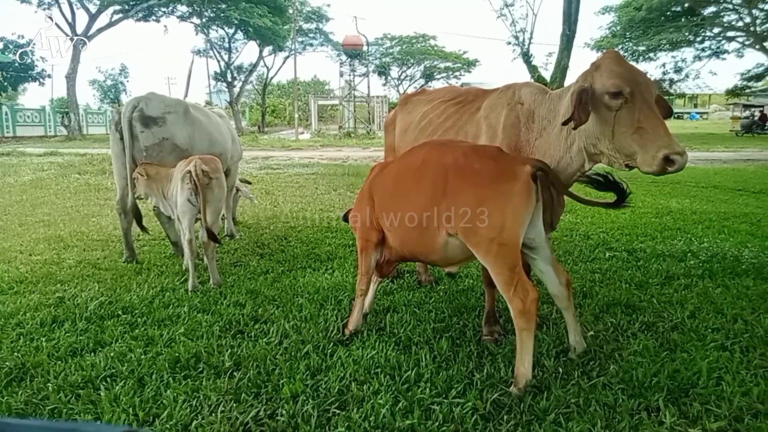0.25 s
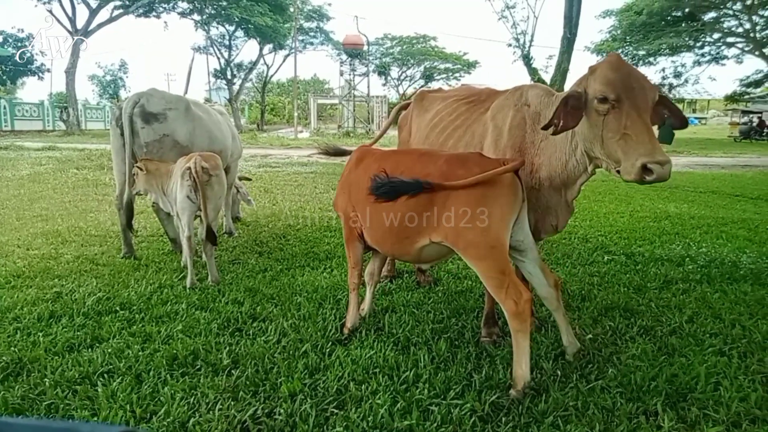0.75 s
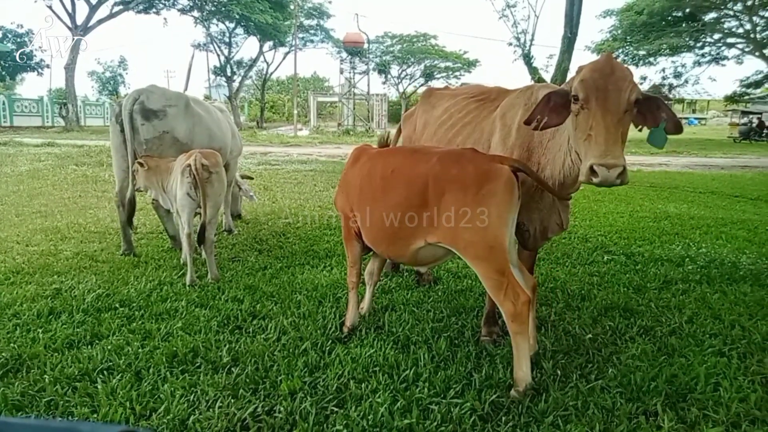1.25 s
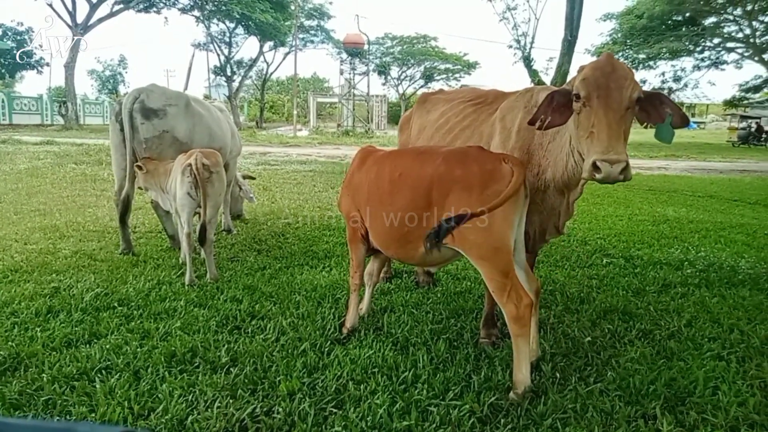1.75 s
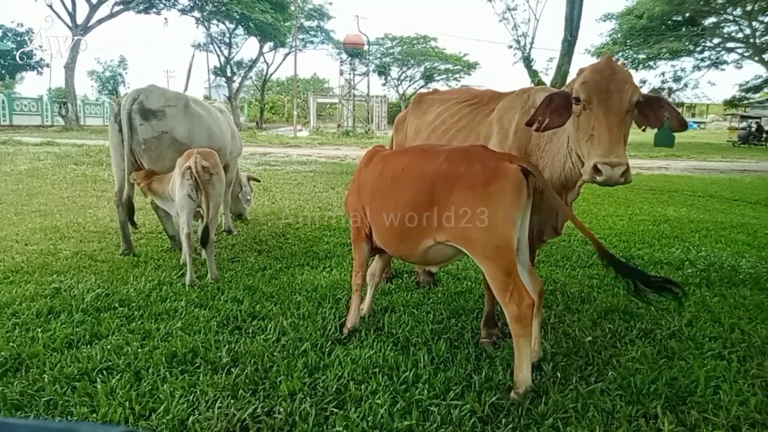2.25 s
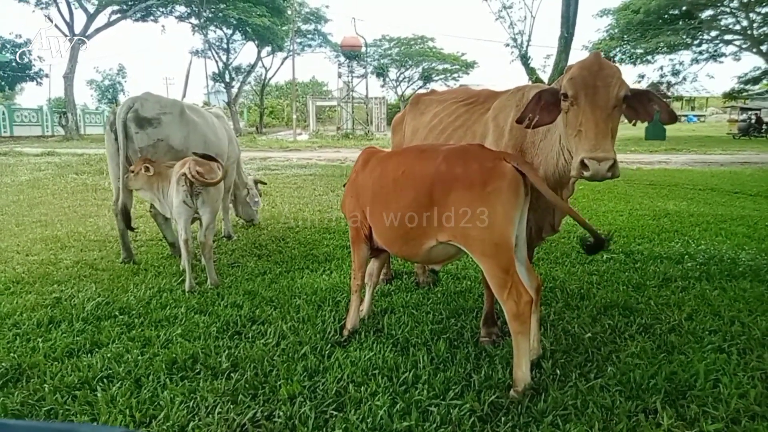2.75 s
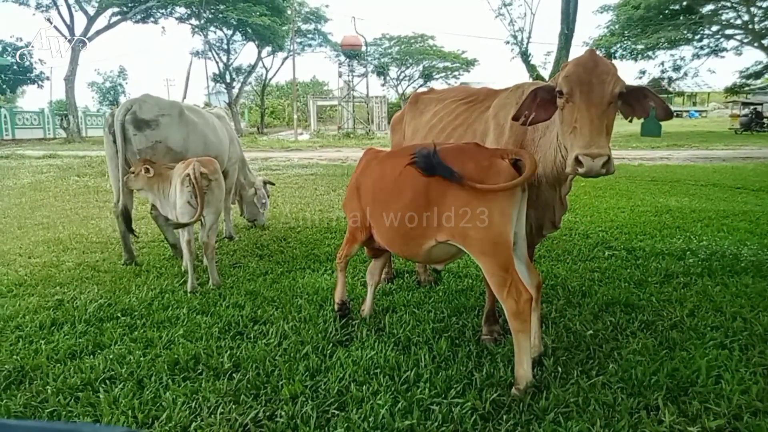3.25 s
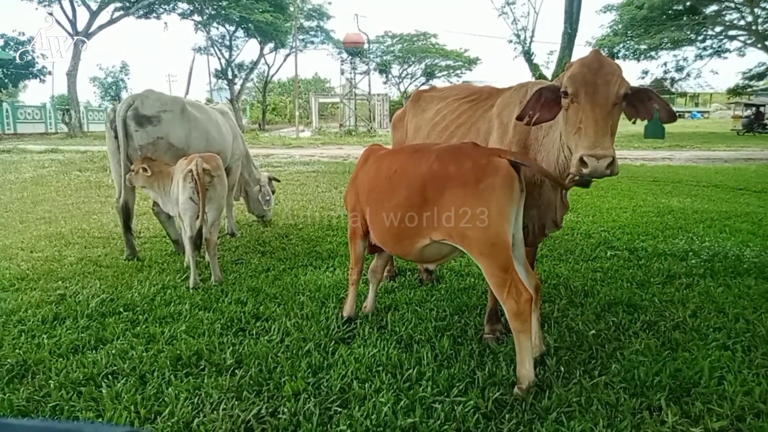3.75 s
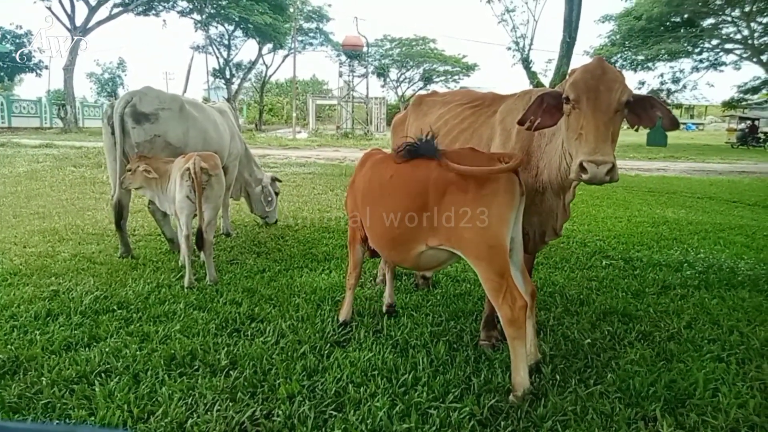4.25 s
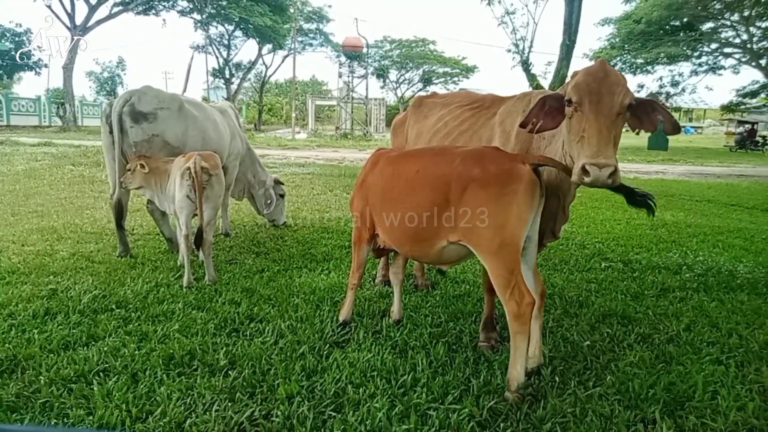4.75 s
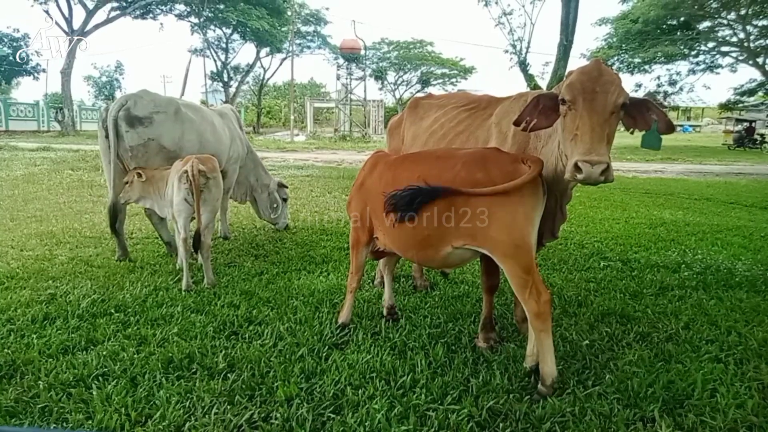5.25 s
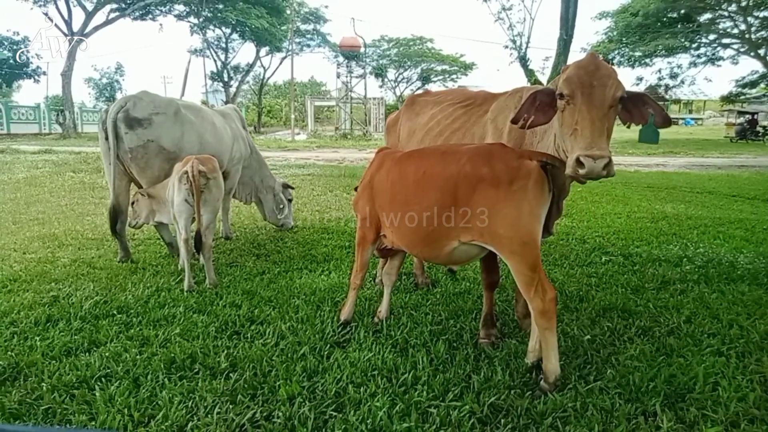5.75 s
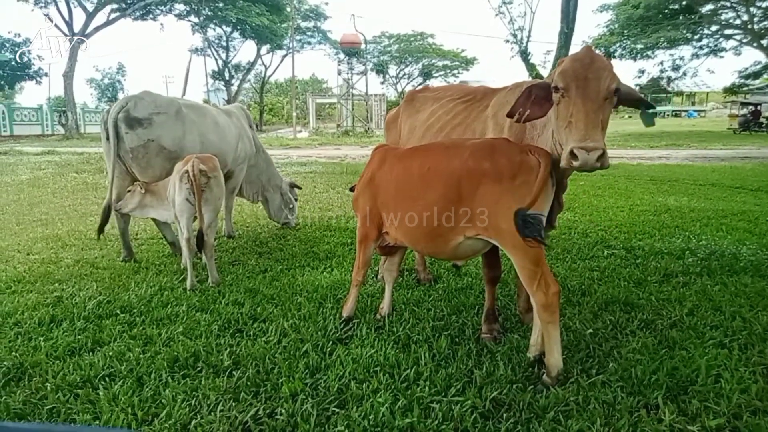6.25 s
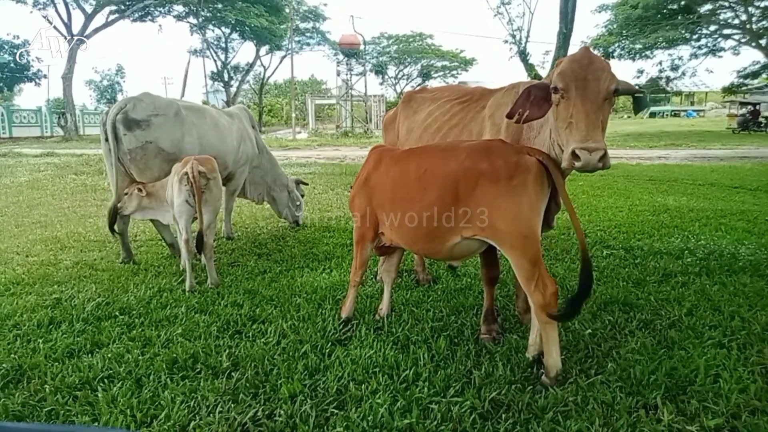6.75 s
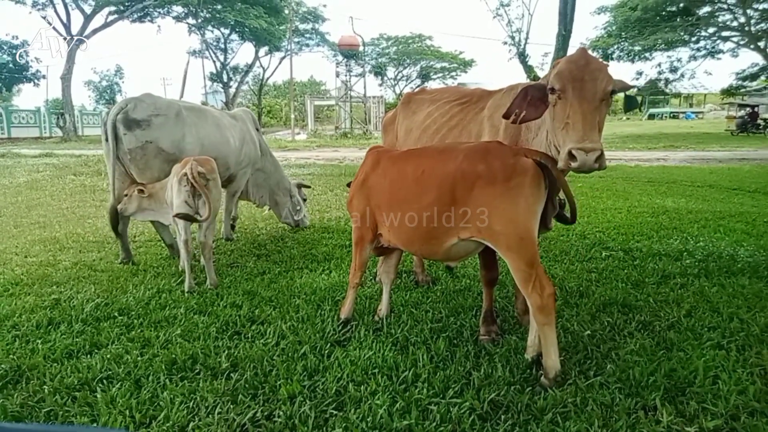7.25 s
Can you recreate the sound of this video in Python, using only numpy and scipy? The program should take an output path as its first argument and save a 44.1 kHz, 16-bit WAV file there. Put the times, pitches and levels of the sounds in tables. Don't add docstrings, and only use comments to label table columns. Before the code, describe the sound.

Two nearby cows call in turn: first a strong bellow caught midway that falls off within a second, then a lower muffled hum that brightens and swells before stopping suddenly. Grass snaps and hoof thuds accompany the first; nose breaths fill the gap. A distant cow overlaps the second. Steady engine rumble, leafy hiss, thin whine and tiny bird chirps continue in dry open air.

```python
import sys
import numpy as np
from scipy import signal
from scipy.fft import rfft, irfft, next_fast_len
from scipy.io import wavfile
from scipy.ndimage import uniform_filter1d, map_coordinates

SR = 44100
rng = np.random.default_rng(int(sys.argv[2]) if len(sys.argv) > 2 else 0)


def to_wav(sig):
    pcm = np.clip(np.atleast_2d(sig), -1, 1) * 32767
    pcm = np.round(pcm).astype(np.int16)
    wavfile.write(sys.argv[1], SR, pcm.T)


def ratio_of_db(decibels):
    return 10 ** (np.asarray(decibels, float) / 20)


N = 331191

# time in seconds, level in dB.
FIRST_EFFORT_DB = [(0, -25.5), (.03, -26.5), (.18, -22.5), (.49, -18.5), (.64, -18), (.72, -15.5),
                   (.78, -18), (.825, -27.5), (.862, -39)]
SECOND_EFFORT_DB = [(2.17, -40), (2.3, -26.5), (2.45, -22.5), (2.66, -21), (2.89, -22), (3.0, -21),
                    (3.168, -19.5), (3.374, -16.5), (3.537, -16.5)]
# time in seconds, pitch in Hz.
FIRST_PITCH_HZ = [(0, 169.4), (0.152, 175.3), (.335, 178.2), (.41, 175.9), (.6, 178.3), (.674, 171.6),
                  (.72, 158.8), (.806, 112.3), (0.884, 80.1)]
SECOND_PITCH_HZ = [(2.17, 91.3), (2.49, 121.9), (2.64, 131.5), (2.75, 136.5), (2.971, 139.4), (3.08, 139),
                   (3.202, 136.6), (3.401, 136.5), (3.535, 133)]
# frequency in Hz, level in dB.
EARLY = ([(174, -11.4), (348, -8.6), (522, -10.3), (696, -9.9), (870, -5.9), (1044, -8.8), (1218, -18.8),
          (1392, -8.4), (1566, -16.2), (1740, -12.9), (1914, -17.4), (2087, -21.8), (2261, -22.7)],
          [(2435, -24.1), (2783, -29.0), (3131, -26.8), (3305, -39), (3653, -35.8), (3827, -41.1),
          (4001, -37.6), (4175, -40.7), (4349, -51.5), (4697, -54.6), (5045, -45.5), (5219, -47.7)])
HELD = ([(177, -12.7), (354, -9.1), (531, -7.7), (709, -10.1), (886, -6.2), (1063, -8.3), (1240, -20.0),
         (1417, -8.1), (1594, -17.1), (1771, -17.8), (1948, -19.9), (2126, -24.0), (2303, -28.7)],
         [(2480, -27.8), (3011, -33.7), (3188, -28.9), (3365, -38.3), (3543, -33.1), (3897, -43.8),
         (4074, -36.8), (4428, -51.2), (4605, -55.7), (4782, -47.5), (4960, -43.6), (5314, -55.1)])
TURNING = ([(170, -18), (340, -8), (510, -9), (680, -8), (850, -8), (1020, -5), (1190, -19), (1360, -13),
            (1530, -17), (1700, -9), (1870, -24), (2040, -12), (2210, -19)], [(2380, -26), (2720, -25),
            (2890, -34), (3230, -28), (3570, -33), (3900, -42), (4500, -52), (5100, -50)])
DROPPING = ([(159, -19), (318, -7), (477, -12), (636, -6), (795, -12), (954, -4), (1113, -13), (1272, -19),
             (1431, -8), (1590, -15), (1749, -12), (1908, -25), (2067, -15)], [(2226, -20), (2385, -24),
             (2700, -24), (2940, -32), (3180, -25), (3500, -32), (3900, -38), (4900, -55)])
CLOSING = ([(138, -24), (277, 0), (415, -19), (554, -9), (692, -17), (830, -10), (969, -3.5), (1107, -16),
            (1246, -27), (1384, -1), (1523, -19), (1661, -9), (1799, -21)], [(1938, -20), (2100, -10),
            (2300, -22), (2630, -22), (2907, -24), (3460, -31.5), (3876, -40), (4291, -46), (4983, -62)])
FADING = ([(113, -21), (226, -3), (340, -12.5), (453, -22), (566, -12), (679, -15), (792, -17), (905, -6),
           (1019, -12), (1132, -23), (1245, -24), (1358, -10), (1471, -18)], [(1700, -15), (2040, -29),
           (2330, -9), (2650, -32), (2900, -24), (3400, -30), (4000, -36), (4600, -48)])
# frequency in Hz, level in dB.
MURMUR = ([(115, -8), (231, -7.5), (346, -5.5), (462, -8), (577, -15), (692, -25), (808, -14), (923, -15),
           (1039, -5), (1154, -20), (1270, -13), (1385, -15), (1500, -20)], [(1600, -20), (2080, -20),
           (2250, -7), (2420, -13), (2700, -30), (3000, -16), (3400, -17), (4200, -44)])
HUM = ([(134, -6), (269, -10), (403, -2), (537, -7), (672, -21), (806, -9), (941, -11), (1075, -8),
       (1209, -17), (1344, -24), (1478, -24), (1612, -31), (1747, -34)], [(1880, -11), (2040, -10),
       (2190, -5.5), (2270, -2), (2340, -19), (2450, -21), (2600, -33), (2900, -20), (3250, -18),
       (3800, -31), (4400, -53)])
LATE_HUM = ([(137, -7), (274, -8), (411, -4.5), (548, -8), (685, -12), (822, -16), (959, -11), (1096, -15),
             (1233, -13), (1370, -17), (1640, -28)], [(1900, -13), (2055, -10), (2190, -7), (2330, -17),
             (2600, -30), (3150, -21), (3400, -24), (3800, -34), (4400, -52)])
CRACKED = ([(138, -10), (276, -8), (414, -17), (552, -8), (690, -4), (828, -14), (966, -5), (1104, -16),
            (1242, -24), (1650, -24)], [(1930, -11), (2070, -11), (2210, -11), (2350, -23), (2760, -30),
            (3170, -13), (3400, -27), (4400, -55)])
BURST = ([(138, -12), (277, -2), (415, -9), (554, -10), (692, -8), (830, -19), (969, -1), (1107, -15),
          (1246, -17), (1520, -15), (1660, -24)], [(1800, -21), (1940, -12), (2077, -5), (2215, -19),
          (2560, -30), (2770, -19), (2910, -31), (3185, -22), (3460, -36), (4400, -50), (5200, -52)])
POPPED = ([(139, -16.7), (279, -4.2), (418, -11.3), (557, -12.7), (696, -13.1), (836, -19.5), (975, -8.3),
           (1114, -11.2), (1253, -25), (1393, -14), (1532, -18), (1671, -24), (1810, -21.5)], [(1950, -17),
           (2089, -10.5), (2367, -24), (2500, -33), (2785, -28), (2924, -22), (3481, -39), (3621, -37),
           (3899, -43), (4038, -52), (4595, -55.6), (5152, -52.1), (5292, -57.9)])
PARTED = ([(139, -16.7), (279, -4.2), (418, -11.3), (557, -12.7), (696, -13.1), (836, -16.6), (975, -8.8),
           (1114, -11.2), (1253, -23), (1393, -13.2), (1532, -16.5), (1671, -19.3), (1810, -17.5)],
           [(1950, -30), (2089, -15), (2228, -21), (2367, -25), (2785, -31), (2924, -40), (3064, -25),
           (3200, -34), (3481, -40.8), (3621, -36.1), (3899, -42.0), (4038, -50.5), (4595, -55.6),
           (5152, -52.1), (5292, -57.9)])
OPENING = ([(137, -19.4), (275, -2.8), (412, -13.0), (550, -11.9), (687, -10.6), (825, -18.0), (962, -9.1),
            (1100, -15.7), (1237, -17.4), (1375, -19.6), (1512, -13.9), (1650, -20.5), (1787, -22.5)],
            [(1925, -25.7), (2062, -20.7), (2475, -37.4), (2612, -27.3), (2750, -40.0), (3025, -33.0),
            (3162, -40.4), (3300, -35.5), (3712, -46.7), (4124, -46.9), (4262, -55.7), (5224, -60.6)])
WIDE = ([(136, -27), (273, -2.9), (409, -14.9), (545, -12.4), (682, -11.2), (818, -20.5), (955, -10.2),
         (1091, -15), (1227, -18.9), (1364, -25.4), (1500, -9.3), (1636, -26.5), (1773, -22.7)],
         [(1909, -29.3), (2182, -16.9), (2318, -34.2), (2455, -27.2), (2864, -39.4), (3000, -28.0),
         (3137, -43.0), (3955, -42.0), (4364, -47.8), (4773, -63.8), (5046, -51.2), (5182, -64.5)])
LAST = ([(134, -27), (269, -2.8), (403, -13.8), (537, -12.3), (671, -11.3), (806, -19.1), (940, -11.2),
         (1074, -10.3), (1208, -20.0), (1343, -26.1), (1477, -11.2), (1611, -28.4), (1746, -20.0)],
         [(1880, -25.2), (2417, -26.1), (2551, -37.7), (2685, -24.4), (2820, -41.5), (3223, -33.6),
         (3625, -49.6), (3894, -42.8), (4162, -59.5), (4297, -46.1), (4700, -59.5), (5102, -58.1)])
# time in seconds, shape number.
FIRST_MOUTH = [(.12, 0), (.35, 1), (.62, 1), (.68, 2), (.72, 3), (.76, 4), (.8, 5)]
SECOND_MOUTH = [(2.48, 0), (2.58, 1), (2.66, 1), (2.74, 2), (2.84, 2), (2.868, 3), (2.88, 3), (2.898, 4),
                (2.925, 5), (2.97, 5), (3.02, 6), (3.09, 6), (3.15, 7), (3.18, 7), (3.24, 8), (3.42, 8),
                (3.48, 9)]
# time in seconds, air re tone in dB, loss of upper overtones in dB per kHz.
HOARSE = [
    [(0, -16, .6), (.15, -17, .5), (.27, -14.5, 1.5), (.39, -28, 0), (.47, -22, 0), (.56, -17.5, .8), (.63, -28, 0), (.79, -26, 0), (.825, -27, 8)],
    [(2.17, -16, 0), (2.86, -21, 0), (2.93, -26, 0), (3.0, -31, 0), (3.2, -29, 0), (3.54, -25.5, 0)],
]
# frequency in Hz, level in dB per Hz.
BUZZ = ([
    [(3060, -28), (5200, -3.5), (5860, -2), (7070, -4), (8940, -7), (10300, -10), (11800, -5), (12600, -10), (14500, -2), (15300, -8), (15750, -9)],
    [(3060, -30), (5200, -1), (5520, 6), (7110, -13), (7680, 0), (10200, -6), (11700, -3), (12700, -2), (14400, 1), (15200, 0), (15750, -15)],
])
# buzz at the pivot level in dB, slope in dB per dB.
BUZZ_LAW = [
    (-59, 0.8),
    (-59, 1),
]
# lead in half cycles, lag in half cycles,
# centre in Hz, width in Hz.
CHEST = [
    (.9, .8, 330, 150),
    (.7, .6, 180, 180),
]
CUT_SHARE = (.17, .21)
PIVOT_DB = -20
LIPS_PART_S, PARTING_S, MUFFLE_DB = 2.872, 0.026, -12
CHEST_LAG_S, CHEST_DIP_NEPER = 0.039, 0.44
RIPPLE_HZ, RIPPLE_DEPTH, SHUT_DEPTH, SHUT_LIFT_DB = 1025, (.1, .2), .7, 6
GRAIN_DB, GRAIN_HZ = 6, 150

# peak in seconds, half length in seconds, level in dB, hiss in dB.
BREATHS = [(.13, 0.18, -39.5, -66), (0.554, 0.068, -43, -70), (1.086, 0.15, -45.5, -68),
           (1.61, 0.23, -37, -54), (2.051, 0.097, -49, -77), (2.592, 0.43, -40, -63),
           (2.607, 0.045, -63, -58.5), (6.172, 0.24, -50.5, -69), (7.165, 0.12, -42.5, -58.5)]
# centre in Hz, width in Hz, gain in dB.
NOSE = [(790, 180, -10.5), (1560, 110, -2), (2270, 420, -12.5), (2600, 266, -9.5), (3335, 162, -9)]
NOSTRIL = [(6430, 1600, 1), (9400, 2800, -6.5)]

FAR_S, FAR_END_S, FAR_ATTACK_S, FAR_RELEASE_S, FAR_DB, FAR_ACCENT_DB = 2.41, 3.33, 0.041, 0.115, -37, 9
FAR_HZ, FAR_CLIMB_HZ, FAR_CLIMB_S, FAR_DROP_HZ = 303, 80, .2, 50

# time in seconds, peak in dB, centre in Hz.
SNAPS = [(.194, -32, 9700), (.194, -26, 6700), (.204, -34, 10200), (.211, -32, 9900), (.212, -27, 6750),
         (.288, -38, 6500), (7.382, -33, 8000)]
SNAP_WIDTH_SHARE, SNAP_T60_S = 0.18, 0.0091
# time in seconds, peak in dB.
HOOVES = [(.251, -31), (.637, -26), (5.12, -36.5)]
HOOF_HZ, HOOF_WIDTH_HZ, HOOF_T60_S = 445, 140, .07

# time in seconds, length in seconds, start in Hz, end in Hz, level in dB.
CHIRPS = [(0, 0.033, 4700, 4500, -62), (.21, 0.044, 5500, 5900, -63), (.6, 0.049, 6363, 6244, -60),
          (3.54, 0.068, 4350, 5100, -70), (3.972, .014, 4600, 5700, -64), (3.98, 0.032, 5400, 5550, -66),
          (4.0, .02, 6400, 6500, -72), (6.11, .08, 7450, 7050, -68), (6.16, .055, 6700, 6600, -68),
          (6.17, 0.036, 6300, 6050, -69)]
# time in seconds, length in seconds, level in dB.
FALLS = [(.805, .135, -69), (2.57, .08, -68), (4.43, .1, -66)]
FALL_START_HZ, FALL_END_HZ = 4900, 3950

# time in seconds, length in seconds, frequency in Hz, level in dB.
PASSING_ORDERS = [(2.66, .24, 114, -41), (6.45, 0.37, 165.1, -47), (6.6, 0.52, 141.9, -48),
                  (6.92, 0.32, 248.3, -55.5), (7.02, 0.32, 303, -59), (7.202, 0.35, 238.4, -55.5),
                  (6.15, 0.26, 350, -63), (6.282, 0.35, 439, -67), (6.4, 0.68, 385, -66),
                  (7.301, 0.19, 419, -63.5)]
SAG = 0.99

# frequency in Hz, level in dB per Hz.
TRAFFIC = [(15, -69), (25, -25), (65, -9.5), (129, 3), (217, -10.5), (257, -14.5), (287, -35), (330, -28),
           (430, -46), (730, -120)]
# peak in seconds, half length in seconds, swell in dB.
PASSES = [(.55, 0.26, 2.5), (1.323, 0.07, 2.5), (2.003, 0.18, 2.5), (2.7, 0.47, 3), (5.493, 0.21, 3.5),
          (6.687, 0.1, 1.5), (7.355, 0.17, -4)]
# frequency in Hz, level in dB.
EXHAUST = [(84, -4.5), (112, -0.5), (140, -1.5), (168, 0), (195, -5.5), (223, -15.5), (251, -14),
           (280, -26), (450, -20.5)]
FIRING_HZ = 27.6
# frequency in Hz, level in dB per Hz.
HAZE = ([(150, -38), (260, -4.5), (500, -9.5), (780, -4.5), (1750, -3.5), (1930, -1.5), (2120, -4),
         (2340, -4), (2600, -4.5), (3150, -5), (3900, -12), (4150, -19.5), (5100, -35)], [(5800, -25),
         (6850, -22.5), (11200, -32), (11700, -36.5), (15400, -40), (15600, -60)])
# peak in seconds, half length in seconds, swell in dB.
GUSTS = [(1.673, 0.13, 0), (4.9, 0.46, 0.5), (7.243, 0.25, 2)]
TRAFFIC_DB, HAZE_DB = -41, -42.5
# frequency in Hz, width in Hz, level in dB.
WHINE = [(1913, 5, -53), (1893, 15, -55), (2290, 49, -55), (2403, 27, -65), (3776, 32, -61.5),
         (5670, 45, -78), (9600, 40, -89)]


def unit(x):
    return x / np.sqrt(np.mean(x ** 2) + 1e-20)


def along(points, hz):
    f, v = np.transpose(points)
    return np.interp(np.log(hz + 1), np.log(f + 1), v)


def curves(rows, t):
    s, *cols = np.transpose(rows)
    return [np.interp(t, s, c) for c in cols]


def wobble(rate_hz, size=N):
    at = np.arange(0, size + 32, 32)
    knots = rng.standard_normal(int(size * rate_hz / SR) + 4)
    return np.interp(np.arange(size), at, map_coordinates(knots, [at * rate_hz / SR]))


def filtered(x, response):
    m = next_fast_len(len(x) + 8192)
    return irfft(rfft(x, m) * response(np.fft.rfftfreq(m, 1 / SR)), m)[:len(x)]


def modes(table):
    def response(f):
        return sum((-1) ** k * ratio_of_db(db) * 1j * f * w / (c * c - f * f + 1j * f * w)
                   for k, (c, w, db) in enumerate(table))
    return response


def rush(response, patchy_db):
    z = signal.stft(rng.standard_normal(N), nperseg=512)[2]
    field = uniform_filter1d(rng.standard_normal(z.shape), size=5, axis=0)
    field = uniform_filter1d(field, size=10, axis=1)
    patchy = signal.istft(z * ratio_of_db(patchy_db * unit(field)), nperseg=512)[1][:N]
    return unit(filtered(patchy, response))


def summed(rows, sizes):
    s, half = np.transpose(rows)[:2, :, None]
    at = np.arange(0, N, 64)
    return np.interp(np.arange(N), at, sizes @ np.exp(-((at / SR - s) / half) ** 2))


def glides(notes, flutter_hz, depth_db):
    out = np.zeros(N + SR)
    for s, length, start_hz, end_hz, db in notes:
        size = round(length * SR)
        u = np.arange(size) / size
        turn = 2 * np.pi * np.cumsum(start_hz + (end_hz - start_hz) * u) / SR
        gain = ratio_of_db(db + 7.0 + depth_db * wobble(flutter_hz, size=size))
        out[round(s * SR):][:size] += gain * np.sqrt(np.sin(np.pi * u)) * np.sin(turn)
    return out[:N]


def cows():
    first_shapes = [EARLY, HELD, TURNING, DROPPING, CLOSING, FADING]
    second_shapes = [MURMUR, HUM, LATE_HUM, CRACKED, BURST, POPPED, PARTED, OPENING, WIDE, LAST]
    first = moo(FIRST_EFFORT_DB, FIRST_PITCH_HZ, first_shapes, FIRST_MOUTH, BUZZ[0], BUZZ_LAW[0],
                muffle_db=0, fade_s=.02, cut=0, count=38)
    second = moo(SECOND_EFFORT_DB, SECOND_PITCH_HZ, second_shapes, SECOND_MOUTH, BUZZ[1], BUZZ_LAW[1],
                 muffle_db=MUFFLE_DB, fade_s=3 / SR, cut=-1, count=37)
    return first + second


def moo(effort, note, shapes, mouth, buzz, law, muffle_db, fade_s, cut, count):
    t = np.arange(round(effort[0][0] * SR), round(effort[-1][0] * SR)) / SR
    shut = np.clip(1 - (t - LIPS_PART_S) / PARTING_S, 0, 1) * (muffle_db < 0)
    level_db = curves(effort, t)[0] + muffle_db * shut
    air_db, dull_db = curves(HOARSE[cut], t)
    buzz_db = law[0] + law[1] * (level_db - PIVOT_DB)
    pitch_hz = uniform_filter1d(curves(note, t)[0], size=900) * (1 + .001 * wobble(70, size=len(t)))
    turn = 2 * np.pi * np.cumsum(pitch_hz) / SR
    turn = turn - turn[cut] + 2 * np.pi * CUT_SHARE[cut]
    tone = overtones(t, pitch_hz, turn, level_db, air_db, dull_db, shapes, mouth, cut, count)
    puffs = rng.standard_normal(len(t)) * (1.0 + np.exp(-4 * np.mod(turn / (2 * np.pi), 1)))
    edge = sharp_edge(turn, puffs, shut, buzz, cut)
    air_shape = np.vstack(shapes[2 * cut])

    def air_response(hz):
        return ratio_of_db(along(air_shape, hz) + 7.6 * np.log2(hz / 1000 + 1)) * (hz > 250) * (hz < 5000)
    air = unit(filtered(puffs, air_response))
    call = ratio_of_db(level_db) * (tone + ratio_of_db(air_db) * air) + ratio_of_db(buzz_db + 2.0) * edge
    ends = np.clip(np.minimum((t[-1] - t) / fade_s, (t - t[0]) / .002), 0, 1)
    out = np.zeros(N)
    out[round(t[0] * SR):][:len(t)] = call * ends
    return out


def tract(shape):
    hz = np.fft.rfftfreq(8192, 1 / SR)
    cepstrum = irfft(np.log(ratio_of_db(along(np.vstack(shape), hz))))
    cepstrum[1:len(hz) - 1] *= 2
    cepstrum[len(hz):] = 0
    return hz, rfft(cepstrum)


def overtones(t, pitch_hz, turn, level_db, air_db, dull_db, shapes, mouth, cut, count):
    k = np.arange(1, count + 1)[:, None]
    step = slice(None, None, 64)
    ts, level_db, air_db, dull_db = t[step], level_db[step], air_db[step], dull_db[step]
    hz = k * pitch_hz[step]
    place = curves(mouth, ts)[0]
    log_gain = sum(np.clip(1 - abs(place - i), 0, 1) * np.interp(hz, *tract(s)) for i, s in enumerate(shapes))
    log_gain += 1j * np.angle(1 + .55 * np.exp(-2j * np.pi * hz * .00305))
    lead, held, chest_hz, width_hz = CHEST[cut]
    log_gain += 1j * np.pi * (lead - held * np.exp(-((hz - chest_hz) / width_hz) ** 2))
    log_gain += np.log(ratio_of_db(-dull_db * np.clip(hz / 1000 - 1.4, 0, None)))
    lag = np.exp(-((ts - LIPS_PART_S - PARTING_S) / CHEST_LAG_S) ** 2)
    loose = 1 + np.clip((-27 - level_db) / 4, 0, .3) + np.clip((air_db + 24) / 7, 0, 1.2)
    drift = np.tanh([wobble(38, size=len(t))[step] for _ in k])
    shimmer_db = loose * np.minimum(.3 + .004 * k ** 2, 3) * 1.3 * drift
    rms = np.sqrt(np.sum(np.exp(2 * log_gain.real), axis=0) / 2)
    gain = ratio_of_db(shimmer_db) * np.exp(-CHEST_DIP_NEPER * lag * (k < 6)) * (hz < 5400) * np.exp(log_gain) / rms
    return sum(np.real(np.interp(t, ts, g) * np.exp(1j * n * turn)) for n, g in zip(k[:, 0], gain))


def sharp_edge(turn, puffs, shut, buzz, cut):
    clicks = np.sin(115.5 * turn) / (np.sin(turn / 2) + 1e-9)
    grain_db = GRAIN_DB * rng.standard_normal(SR // GRAIN_HZ)

    def grain(hz):
        gain = ratio_of_db(np.interp(hz / GRAIN_HZ, np.arange(len(grain_db)), grain_db))
        return gain * np.clip(hz / 3000 - 3, .3, 1) * (hz > 4300)
    source = .52 * unit(filtered(clicks, grain)) + .75 * unit(puffs)

    def rasp(depth, lift_db):
        def response(hz):
            ripple = 1 + depth * np.cos(2 * np.pi * hz / RIPPLE_HZ)
            return ratio_of_db(along(buzz, hz) + lift_db * (hz > 11000)) * (hz > 4300) * ripple
        return filtered(source, response)
    return unit((1 - shut) * rasp(RIPPLE_DEPTH[cut], 0) + shut * rasp(SHUT_DEPTH, SHUT_LIFT_DB))


def breath():
    level_db, hiss_db = np.transpose(BREATHS)[2:]
    air = summed(BREATHS, ratio_of_db(level_db)) * rush(modes(NOSE), patchy_db=1)
    hiss = rush(lambda hz: modes(NOSTRIL)(hz) ** 2, patchy_db=2.5)
    return air + summed(BREATHS, ratio_of_db(hiss_db)) * hiss


def far_cow():
    t = np.clip(np.arange(N) / SR - FAR_S, 0, None)
    ending = np.clip(1 - (FAR_END_S - FAR_S - t) / FAR_RELEASE_S, 0, 1)
    pitch_hz = FAR_HZ - FAR_CLIMB_HZ * np.exp(-t / FAR_CLIMB_S) - FAR_DROP_HZ * ending
    turn = 2 * np.pi * np.cumsum(pitch_hz) / SR
    level = ratio_of_db(FAR_DB + FAR_ACCENT_DB * np.exp(-t / FAR_CLIMB_S * 2))
    size = np.clip(t / FAR_ATTACK_S, 0, 1) ** 2 * (1 - ending) * level
    return size * ratio_of_db(1.8 * wobble(9.1)) * (np.sin(turn) + ratio_of_db(-10.5) * np.sin(2 * turn))


def snaps_and_hooves():
    out, t = np.zeros(N + SR), np.arange(SR // 8) / SR
    rows = [(s, db, hz, SNAP_WIDTH_SHARE * hz, SNAP_T60_S) for s, db, hz in SNAPS]
    rows += [(s, db, HOOF_HZ, HOOF_WIDTH_HZ, HOOF_T60_S) for s, db in HOOVES]
    for s, db, hz, width_hz, t60_s in rows:
        resonance = modes([(hz, width_hz, 0)])
        burst = unit(filtered(rng.standard_normal(len(t)), lambda f: resonance(f) ** 2))
        out[round(s * SR):][:len(t)] += ratio_of_db(db - 60 * t / t60_s) * (1 - np.exp(-t / 0.0011)) * burst
    return out[:N]


def birds():
    falls = [(s, length, FALL_START_HZ, FALL_END_HZ, db) for s, length, db in FALLS]
    return glides(CHIRPS + falls, flutter_hz=176, depth_db=3.3)


def passing_engine():
    notes = [(s, length, hz, SAG * hz, db) for s, length, hz, db in PASSING_ORDERS]
    return glides(notes, flutter_hz=10.7, depth_db=3)


def idling_engine(count):
    turn = 2 * np.pi * np.cumsum(FIRING_HZ * (1 + 0.00445 * wobble(3))) / SR
    out = np.zeros(N)
    for k in range(3, count):
        gain = ratio_of_db(along(EXHAUST, k * 28) + 3.6 * np.tanh(wobble(4)))
        out += gain * np.sin(k * turn + rng.uniform(0, 2 * np.pi))
    return unit(out)


def traffic():
    level_db = TRAFFIC_DB + summed(PASSES, np.transpose(PASSES)[2])
    rumble = ratio_of_db(1.9 * np.tanh(wobble(4.8))) * rush(lambda hz: ratio_of_db(along(TRAFFIC, hz)), patchy_db=1.5)
    return ratio_of_db(level_db - 1) * (0.87 * rumble + 0.82 * idling_engine(count=17))


def haze():
    level_db = HAZE_DB + summed(GUSTS, np.transpose(GUSTS)[2])
    return ratio_of_db(level_db + 0.6 * wobble(8)) * rush(lambda hz: ratio_of_db(along(np.vstack(HAZE), hz)), patchy_db=1.5)


def whine():
    out = np.zeros(N)
    for hz, width_hz, db in WHINE:
        line = filtered(rng.standard_normal(N), lambda f: np.exp(-((f - hz) / width_hz) ** 2))
        out += ratio_of_db(db + 4.0 * np.tanh(wobble(5))) * unit(line)
    return out


def scene():
    near = cows() + breath() + snaps_and_hooves()
    far = far_cow() + birds() + passing_engine() + traffic() + haze() + whine()
    return (near + far)[None]


def roll_off(x):
    return signal.sosfilt(signal.butter(12, 15740, fs=SR, output="sos"), x)


def record(dry):
    return roll_off(dry)


dry = scene()
out = record(dry)
to_wav(out)
```